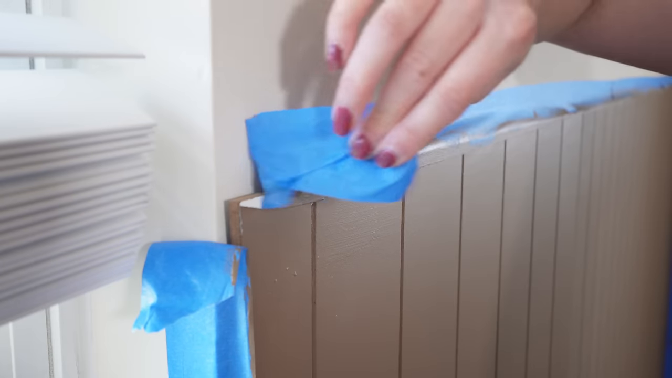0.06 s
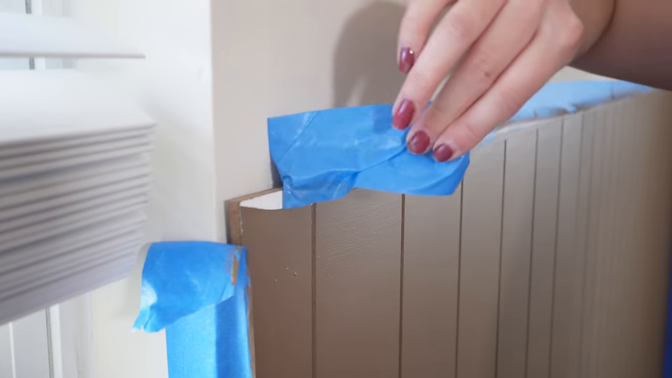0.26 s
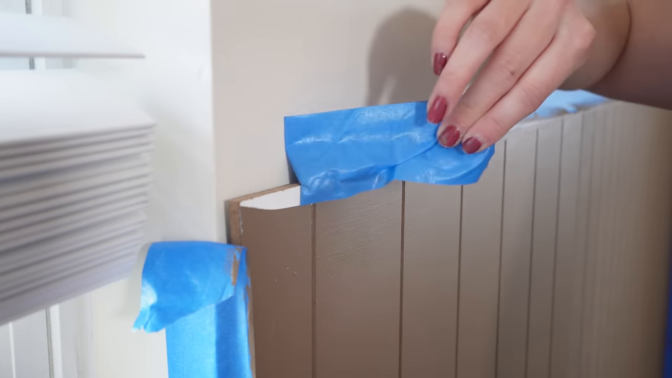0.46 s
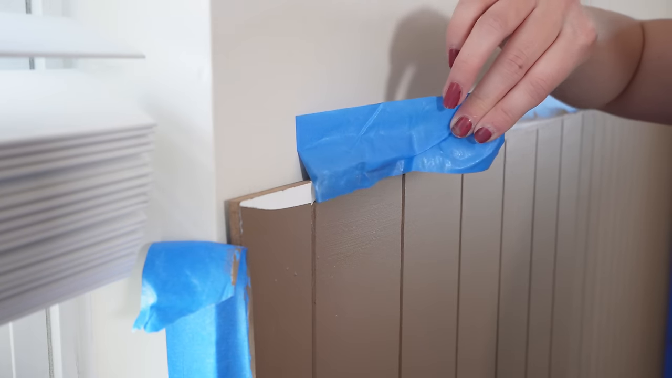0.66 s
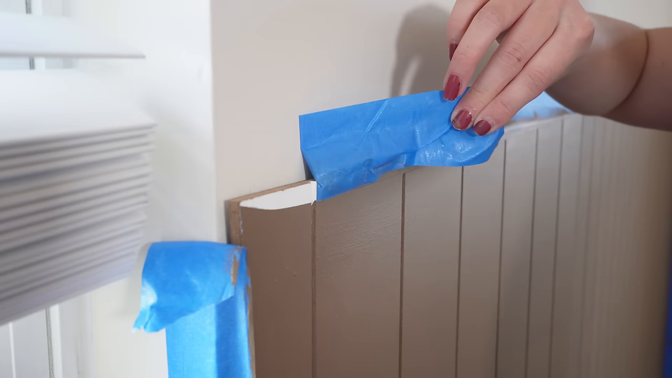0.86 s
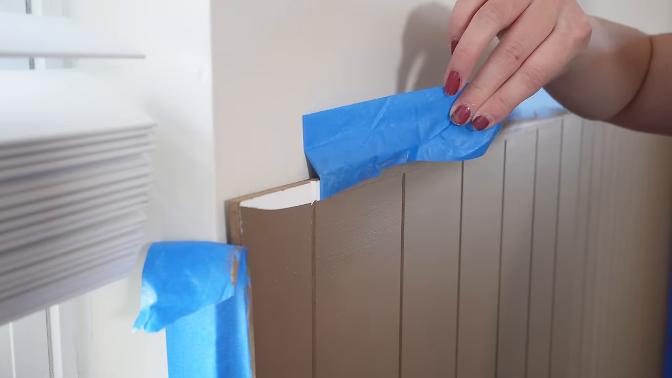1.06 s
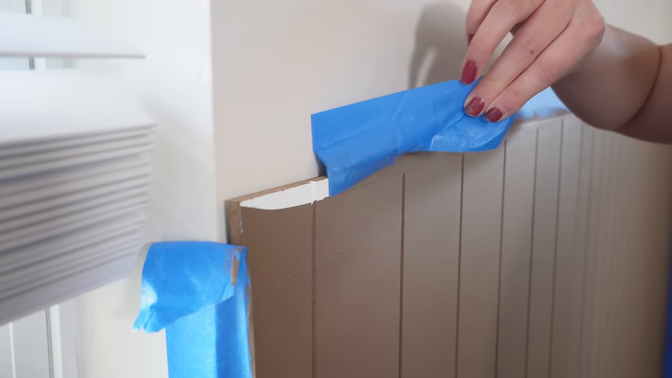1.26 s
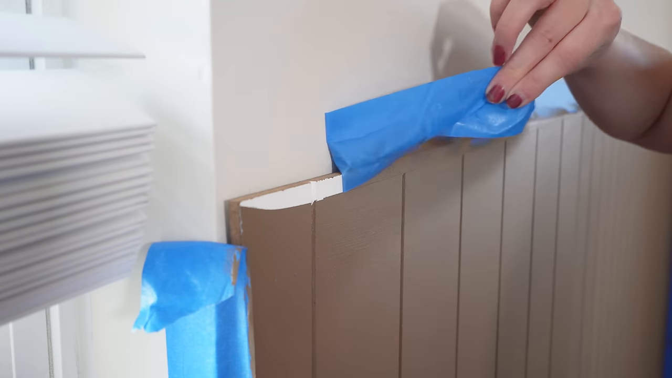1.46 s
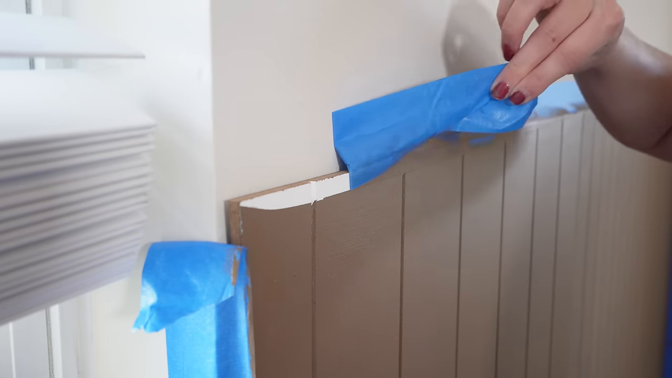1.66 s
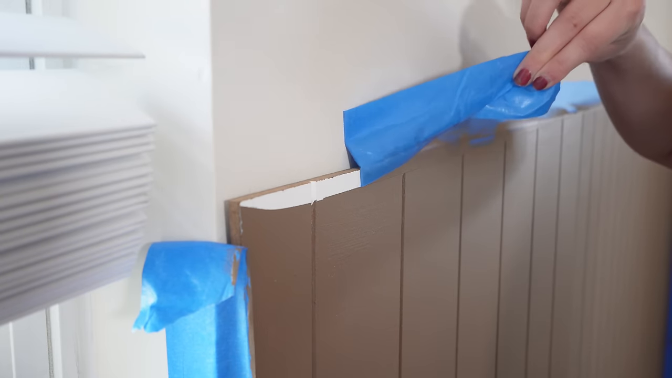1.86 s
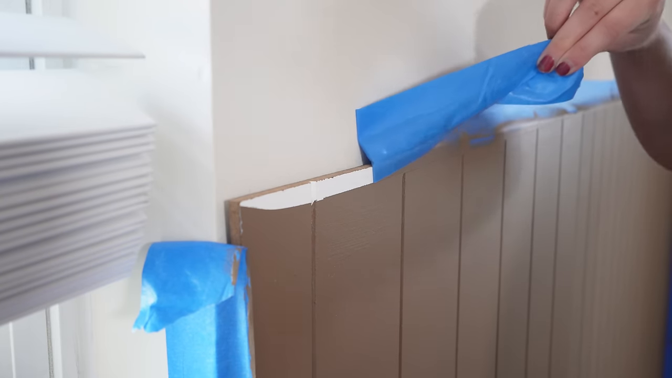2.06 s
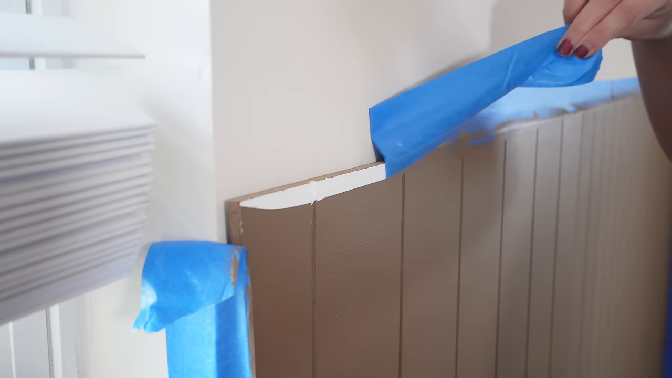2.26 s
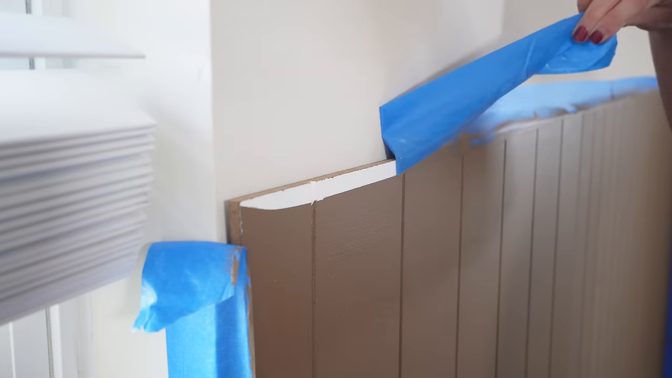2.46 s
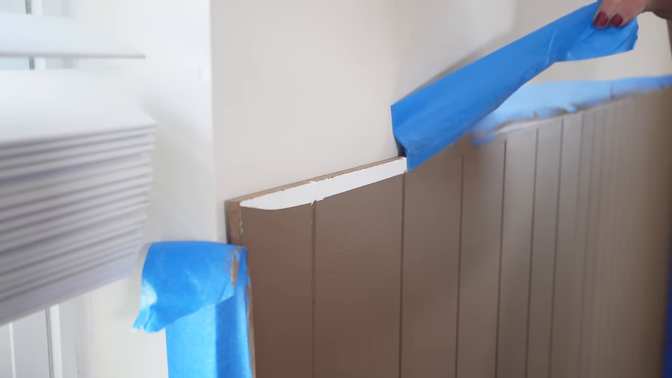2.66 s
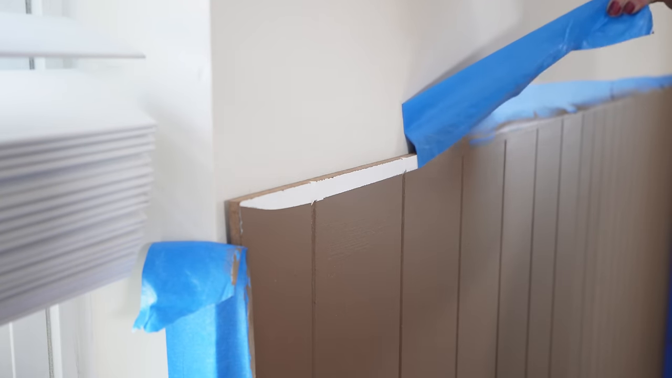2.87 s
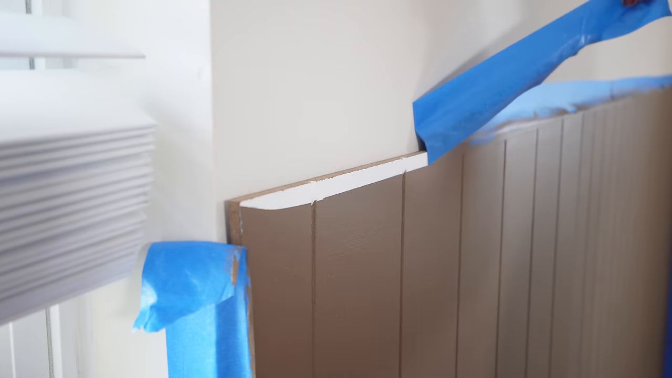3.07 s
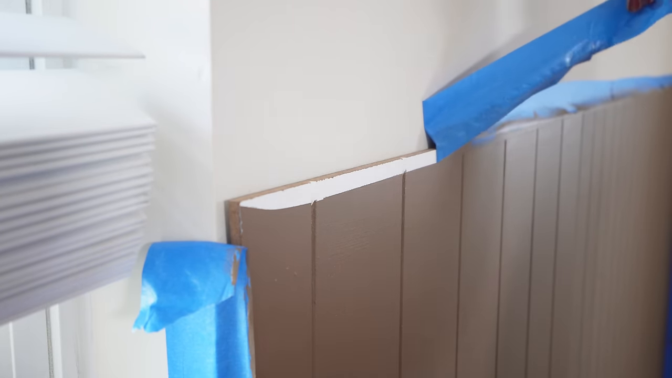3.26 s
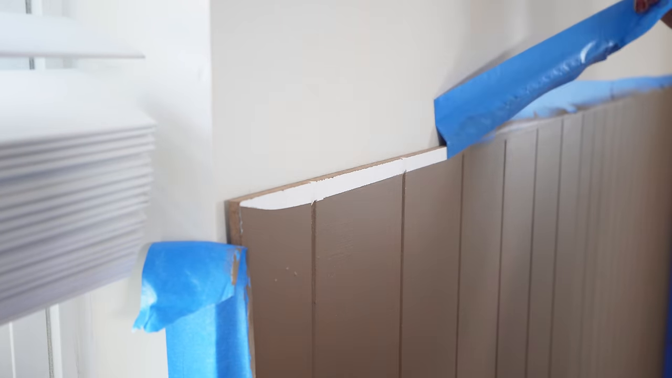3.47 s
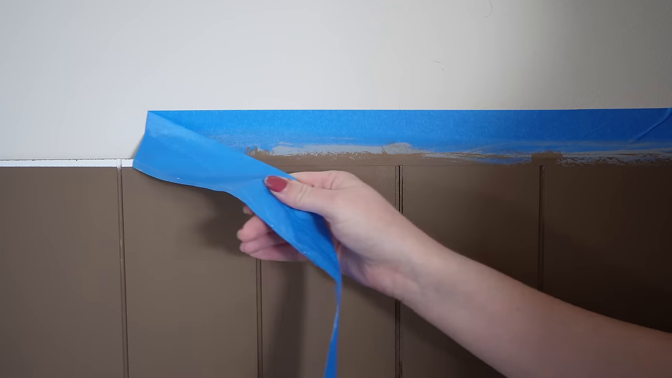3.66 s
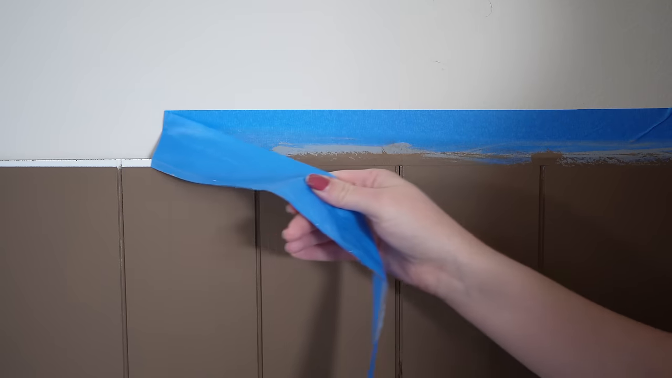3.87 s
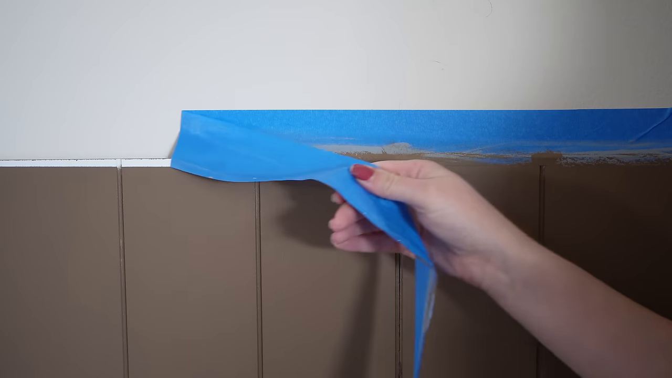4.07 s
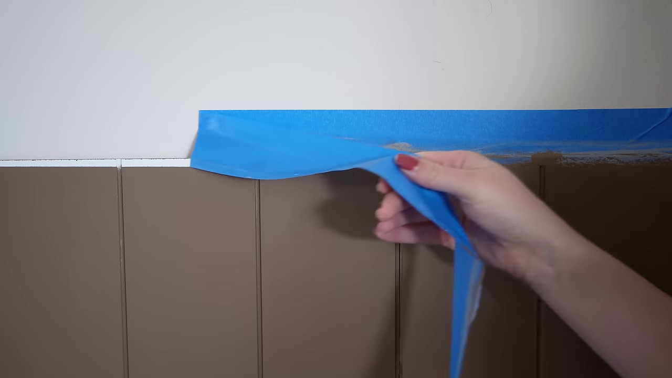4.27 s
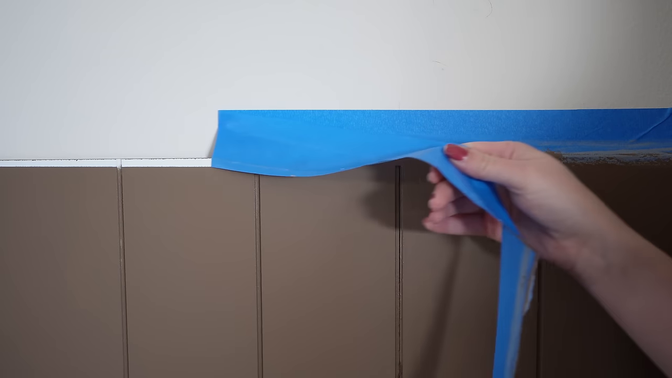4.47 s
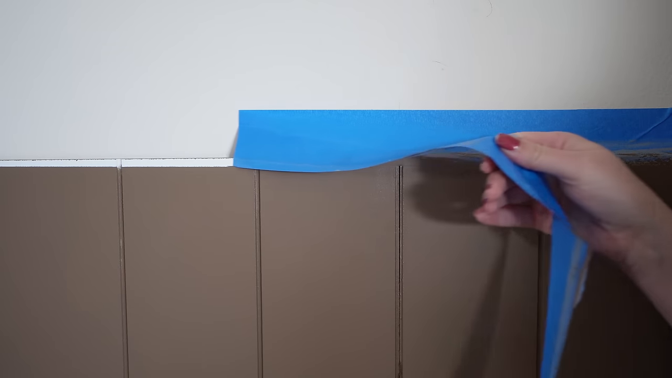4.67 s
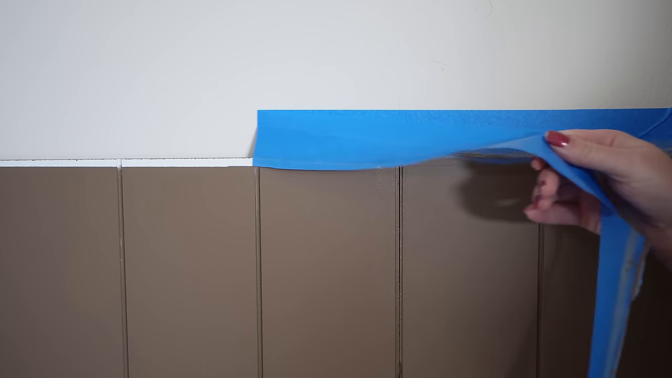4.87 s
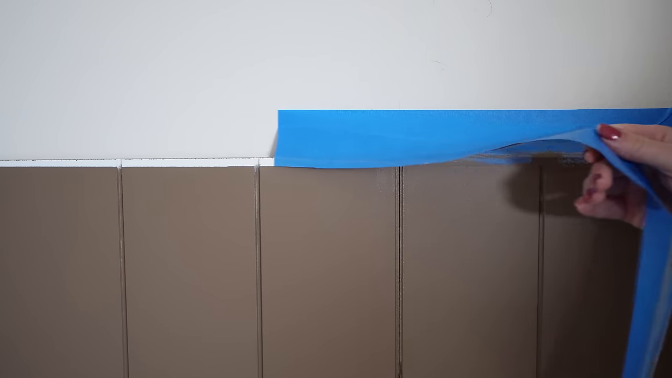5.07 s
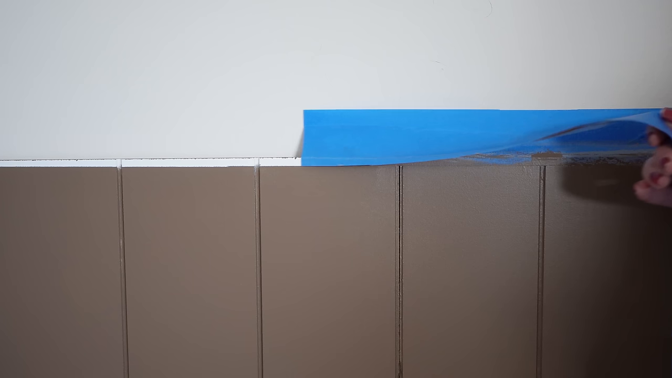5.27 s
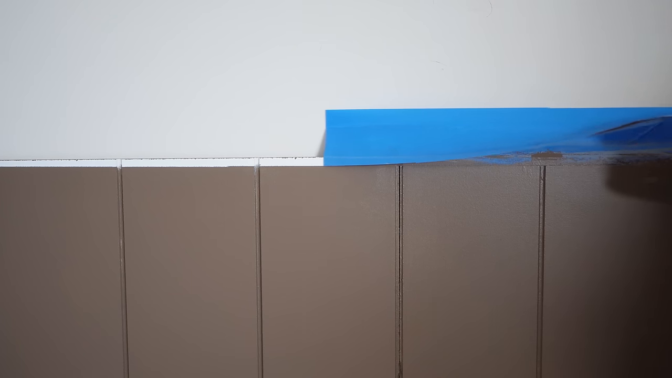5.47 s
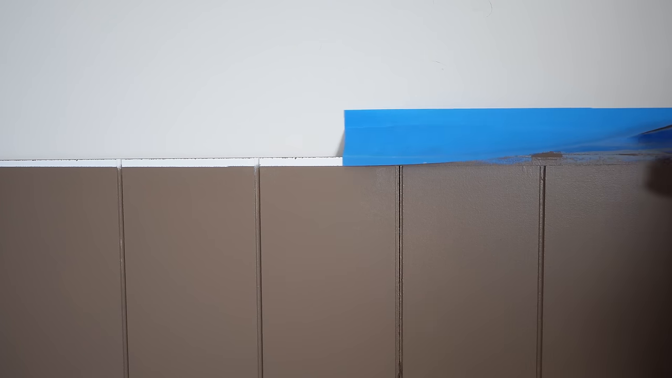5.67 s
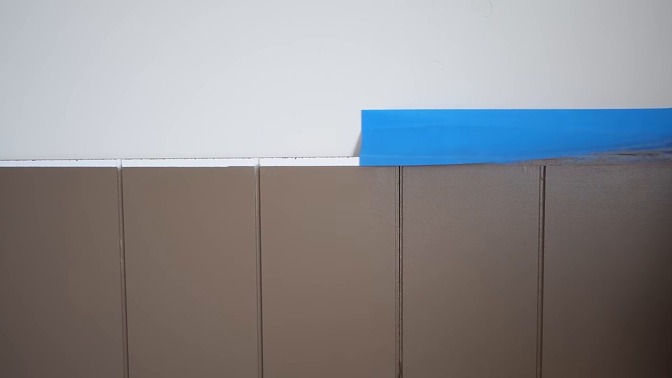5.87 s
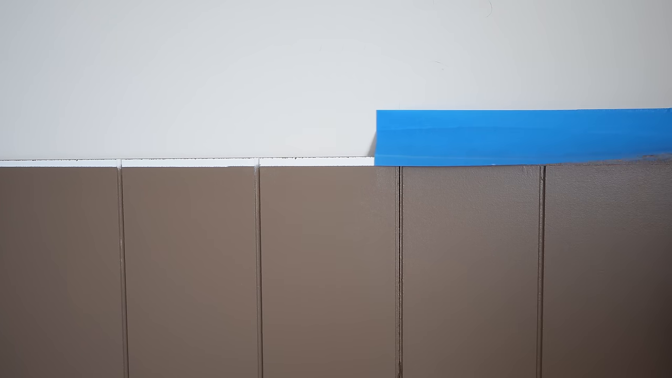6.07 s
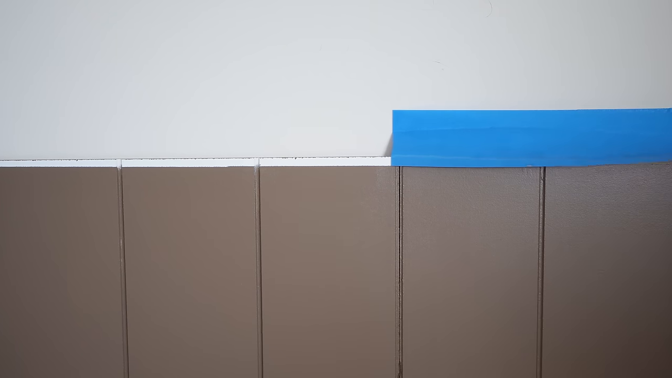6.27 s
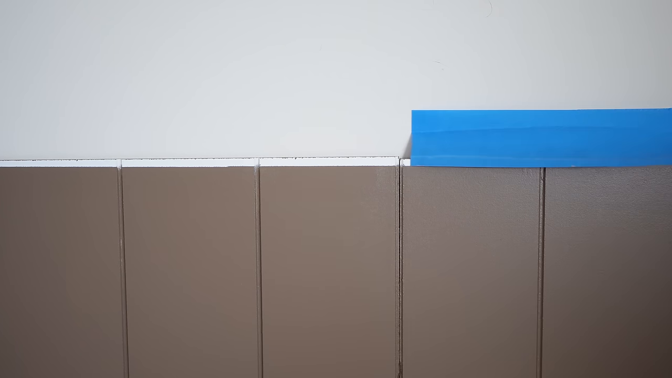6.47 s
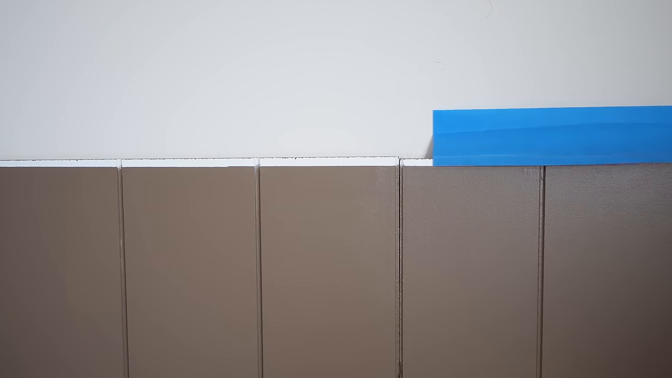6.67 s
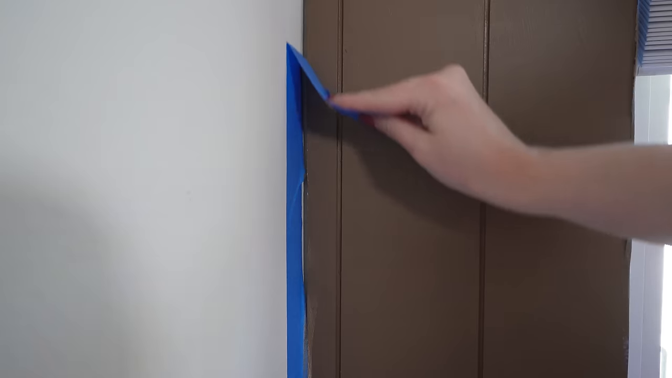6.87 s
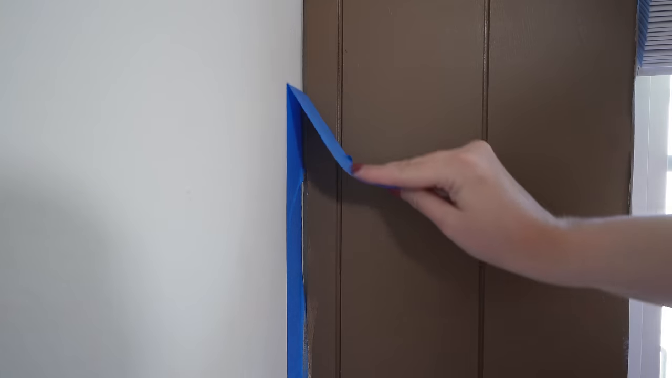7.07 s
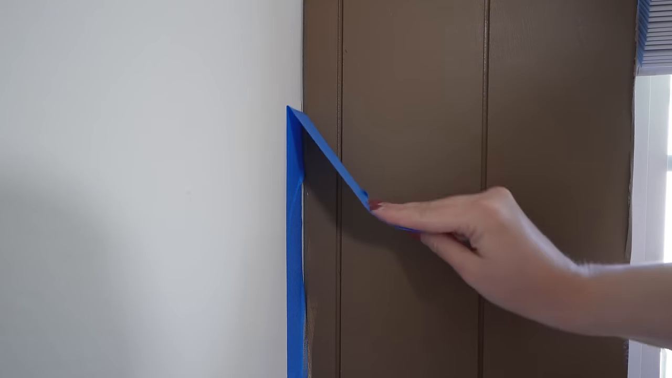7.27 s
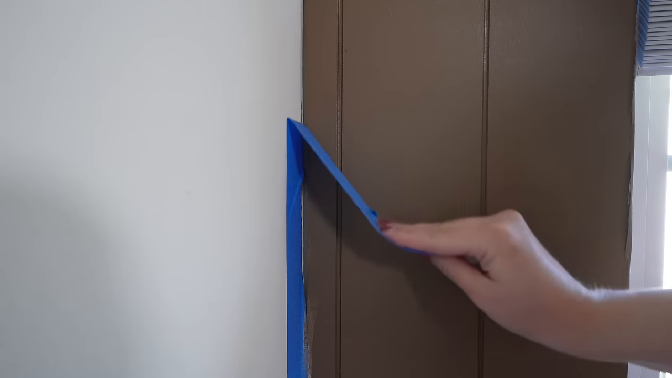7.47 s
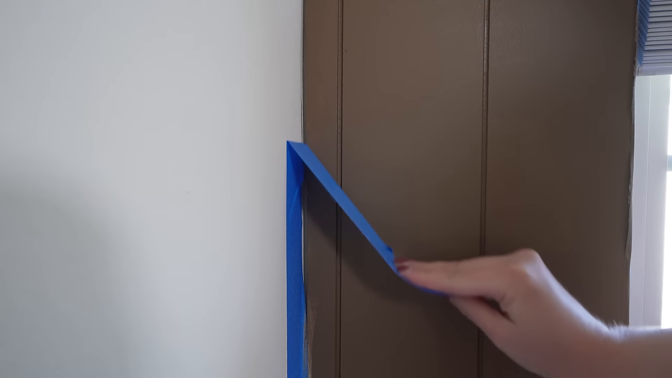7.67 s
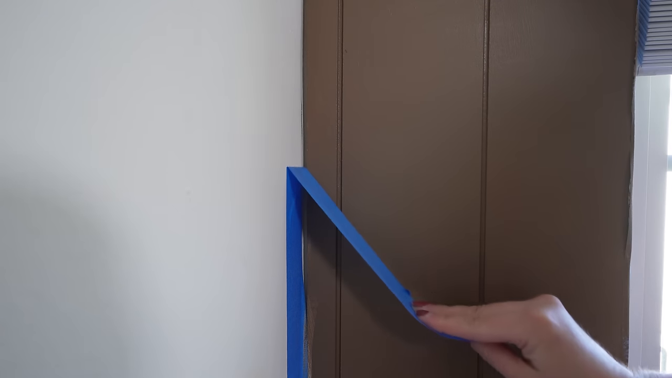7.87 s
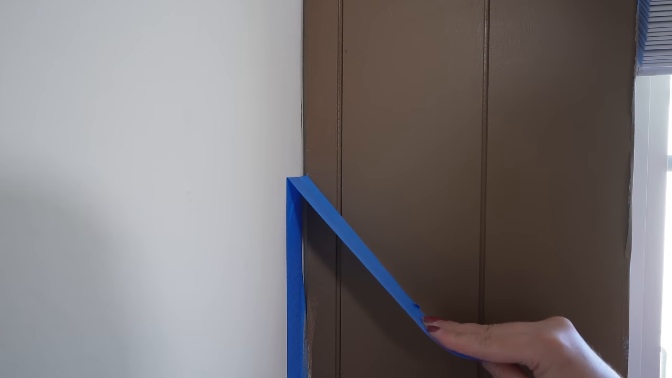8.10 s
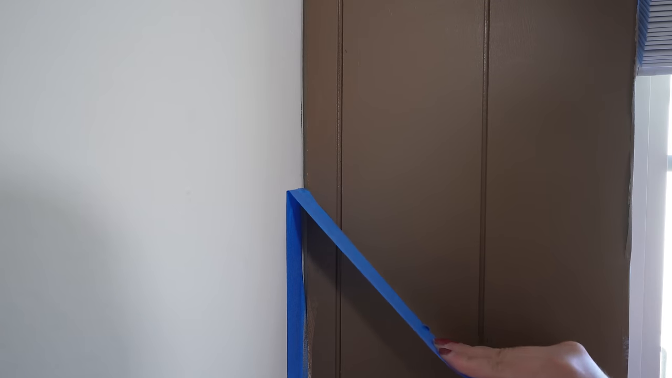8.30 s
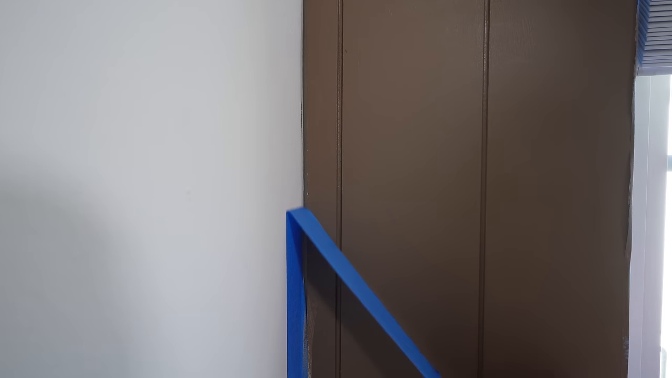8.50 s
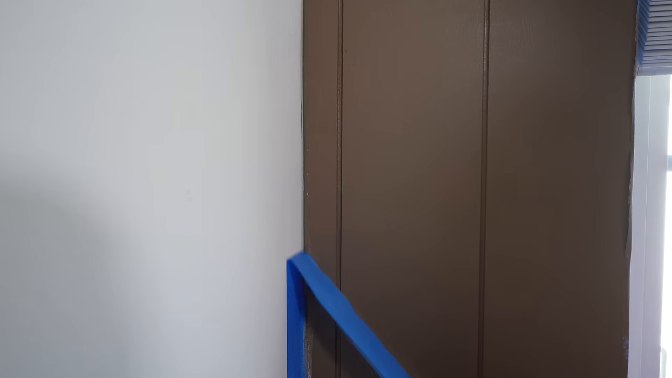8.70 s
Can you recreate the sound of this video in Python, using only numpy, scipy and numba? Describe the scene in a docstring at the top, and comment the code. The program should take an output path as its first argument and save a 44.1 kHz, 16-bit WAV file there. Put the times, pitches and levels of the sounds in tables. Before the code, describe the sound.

Masking tape peels off painted wood panelling up close, first in crackling jerks, then one long fizzing rip, then short downward pulls with sharp snaps.

```python
"""Paper masking tape is peeled off painted wood panelling in a small room, heard from close by.
The first strip lets go in jerks, the second comes off in one long rip, the third in short downward pulls.
Random bursts of glue threads through gliding resonances crackle and fizz, and the panel drums under them.
Paint chips and creases snap as dispersed cracks with a ring and a brief shiver.
Echoes and a short noise tail make the room; filtered noise makes its still air and a faint rumble."""
import sys
import numpy as np
from scipy import signal
from scipy.fft import rfft, irfft
from scipy.io import wavfile
from scipy.ndimage import uniform_filter1d
from numba import njit

SR = 44100
rng = np.random.default_rng(int(sys.argv[2]) if len(sys.argv) > 2 else 0)


def inscribe(sig):
    """Save sig as 16-bit PCM at rate SR to the path in sys.argv[1].

    A 1-D sig is mono; a 2-D sig holds one channel per row.
    Samples are clipped to [-1, 1] before scaling.
    """
    pcm = np.round(np.clip(np.atleast_2d(sig).T, -1, 1) * 32767)
    wavfile.write(sys.argv[1], SR, pcm.astype(np.int16))


N = 385434
TIME = np.arange(N) / SR

# Loudest paint chips and creases snapping. Each row: time in seconds, relative level in dB,
# tilt in dB per octave, ring in Hz, ring height in dB before beaming.
SNAPS = [(0.024, -12.5, -1, 4860, 7.5), (0.0974, -13.5, -3, 2370, 3), (0.1443, -15, -2, 9900, 13),
         (0.1613, -19.5, -4, 1380, 13), (0.2686, -10.5, 0.2, 5060, 8), (0.3609, -0.5, 0.7, 1980, 10.5),
         (0.382, -20, -2.5, 2900, 17), (0.5062, -20, 0.5, 3820, 11), (0.5264, -18.5, 1.5, 3390, 6),
         (0.7289, -9, -0.5, 10100, 5), (1.336, -8, -1, 2430, 4), (1.346, -11, -0.5, 2600, 13),
         (1.475, -17.5, -4, 2240, 16), (1.4823, -4, 1, 2380, 6.5), (1.7774, -14, 0.5, 4570, 12),
         (1.786, 0, 1, 2340, 5), (2.0306, -3.5, 0.1, 1930, 9.5), (2.1817, -10, -0.3, 3710, -5),
         (2.1954, -8, 0, 2200, 10), (2.2267, -16, -2.7, 3240, 5.5), (2.387, -15, -1, 2830, 5),
         (2.3999, -5.5, 0.4, 1890, 4.5), (2.6081, -8, -1.5, 3560, 7), (2.6337, -14, -0.8, 9700, 14),
         (2.6667, -5, -0.2, 1270, 7), (2.713, -14.5, -1.5, 8350, 5), (2.752, -7.5, -1.5, 3070, 3.5),
         (2.9806, -17, -1.5, 1090, 8), (2.989, -7, -2, 2710, 3), (3.015, -11, 2.5, 3770, 6),
         (3.219, -14, -3.5, 3940, 10), (3.2482, -21.5, -6, 1070, 7.5), (3.4047, -6, 1.5, 1510, 0),
         (4.044, -19, 1, 8700, 11), (4.3555, -13.5, 6.5, 10000, -0.5), (4.5356, -12.5, 3, 2570, 12),
         (4.5514, -13.5, 2, 2470, 8.5), (4.591, -14, 2.5, 2450, 8), (4.9688, -8, -3.5, 1550, 10),
         (4.98, -11.5, -1, 9800, 8), (5.7424, -26.5, 4, 10600, 16.5), (5.9607, -12, -0.5, 1290, 7),
         (6.4, -7, -1.5, 3930, 3), (6.4037, -8.5, 6.5, 7100, 9.5), (6.4259, -5, -2, 1310, 20.5),
         (6.434, -7.5, 0.5, 10500, 10), (7.0352, -20, 1, 1620, 22), (7.3482, -24.5, 2.5, 10000, -1),
         (8.3276, -6.5, -0.7, 1780, 8.5), (8.6514, -8, 2, 1640, 7), (8.699, -10.5, -1, 6970, 7.5)]
# Start of each strip in seconds, then the end of the last.
STRIP_STARTS_S = [0, 3.46, 6.83, 9]
# Steady pull on the second strip. Each row: time in seconds, relative crackle level in dB,
# relative fizz level in dB.
RIP = [(3.46, -63.5, -6), (3.75, -62, -4), (3.97, -57, -2), (4.27, -61, 2), (4.42, -57.5, -0.5),
       (4.8, -54.5, 1.5), (5.25, -51.5, -4), (5.85, -55.5, -4), (6.15, -54, -6.5), (6.38, -53, -6.5),
       (6.55, -55.5, -6.5)]


def undb(db):
    """Decibels to gain."""
    return 10 ** (np.asarray(db) / 20)


def unit(x):
    """Scale to rms 1."""
    return x / np.sqrt(np.mean(x ** 2))


def curves(table):
    """Each column of a table, joined by straight lines in time."""
    times_s, *columns = np.transpose(table)
    return [np.interp(TIME, times_s, column) for column in columns]


def convolve(x, response):
    """Sound x through an impulse response."""
    return signal.oaconvolve(x, response)[:len(x)]


def bins(size=2048):
    """Frequencies in Hz at which colours are drawn."""
    return np.maximum(np.arange(size // 2 + 1), 0.5) * SR / size


def colour(points):
    """Gain in dB at each bin, from (Hz, dB) points joined on a log frequency axis."""
    hz, db = np.transpose(points)
    return np.interp(np.log(bins()), np.log(hz), db)


def impulse(db):
    """Minimum-phase response with the given gain, by folding the cepstrum."""
    cepstrum = irfft(np.log(undb(db)))
    half = len(cepstrum) // 2
    cepstrum[1:half] *= 2
    cepstrum[half + 1:] = 0
    return irfft(np.exp(rfft(cepstrum)))


def band(x, hz, kind, order=3):
    """Butterworth filter."""
    return signal.sosfilt(signal.butter(order, hz, kind, fs=SR, output="sos"), x)


def split(x, hz):
    """Steep low and high parts that stay in phase with each other."""
    return [band(band(x, hz, kind, order=4), hz, kind, order=4) for kind in ("lowpass", "highpass")]


def walk(rate_hz):
    """Random levels joined by straight lines, rate_hz of them a second."""
    return np.interp(TIME * rate_hz, np.arange(N // 20), rng.standard_normal(N // 20))


def steady(x, seconds=0.39):
    """Even out slow swells, leaving rms 1 and the quick grain."""
    power = uniform_filter1d(x ** 2, int(seconds * SR))
    return x / np.sqrt(power + 1e-6 * np.mean(x ** 2))


@njit
def resonance(x, centre_hz, width_hz):
    """State-variable band-pass with a moving centre, gain 1 at the peak."""
    y, band_state, low_state = np.empty(len(x)), 0., 0.
    for i in range(len(x)):
        g, damping = np.tan(np.pi * centre_hz[i] / SR), width_hz / centre_hz[i]
        v = (band_state + g * (x[i] - low_state)) / (1 + g * (g + damping))
        band_state = 2 * v - band_state
        low_state += 2 * g * v
        y[i] = damping * v
    return y


def by_strip(values):
    """Each strip's value while that strip is being peeled."""
    spans = zip(values, STRIP_STARTS_S, STRIP_STARTS_S[1:])
    return sum(value * ((TIME >= start) & (TIME < end)) for value, start, end in spans)


def air():
    """Still air of the room: faint steady coloured noise."""
    # Each row: frequency in Hz, relative level in dB.
    air_colour = [(20, -0.5), (45, -13), (200, -5.5), (400, -15.5), (1300, -22.5), (9000, -23),
                  (16000, -43.5)]
    return undb(-77) * unit(convolve(rng.standard_normal(N), impulse(colour(air_colour))))


def rumble():
    """Very faint low-passed noise, opposite in the two ears."""
    return undb(-89) * unit(band(rng.standard_normal(N), 60, "lowpass", order=1))


def walls(tail_db=-12, t60_s=0.33, treble_t60_s=0.49, treble_db=-4):
    """Room response from one spot: distinct echoes and a short tail whose treble decays more slowly."""
    # Nearby walls. Each row: nominal delay in seconds, gain in dB.
    echoes = [(.0068, -19), (0.015, -20.5), (0.0157, -20), (0.027, -33)]
    t = TIME[:SR * 2 // 3]
    noise = rng.standard_normal(len(t))
    tail = band(noise, 6000, "lowpass") * undb(-60 * t / t60_s)
    tail += band(noise, 6500, "highpass") * undb(treble_db - 60 * t / treble_t60_s)
    tail *= 1 - np.exp(-t / 0.0021)
    response = undb(tail_db) * tail / np.linalg.norm(tail)
    for (delay_s, db), shift in zip(echoes, rng.standard_normal(len(echoes))):
        response[int(delay_s * (1 + 0.03 * shift) * SR)] += undb(db)
    return response


def room(x, count=8):
    """As the peel line travels, the room's answer glides from one spot's to the next."""
    spot = np.linspace(0, count - 1, N)
    out = 0
    for k in range(count):
        share = np.sqrt(np.maximum(1 - abs(spot - k), 0))
        out = out + convolve(x * share, walls())
    return out


def bend(x, lag_s=0.000221):
    """Bending waves run slower the lower they are: lag_s is their travel time at 3 kHz."""
    phase = 4 * np.pi * lag_s * np.sqrt(bins() * 3000)
    return irfft(rfft(x) * np.exp(-1j * phase))


def chips(pull_db, count=70, jerky_db=33, long_db=31, downward_db=30, scatter_db=-0.5,
          low_hz=1100, high_hz=10000, ring_db=9):
    """Small flakes of paint snap at random, louder the harder the pull; rows as in SNAPS."""
    level_db = pull_db + by_strip([jerky_db, long_db, downward_db])
    rows = []
    for when, size, tilt, pitch in rng.random((count, 4)):
        db = level_db[int(when * N)] + scatter_db * (2 * size - 1)
        ring_hz = low_hz * (high_hz / low_hz) ** pitch
        rows.append((when * N / SR, db, 2 * (2 * tilt - 1), ring_hz, ring_db))
    return rows


def snaps(rows, focus, level_db=-1, shiver_db=-4, shiver_t60_s=0.0084, shiver_hz=4500, ring_octaves=0.38):
    """Each snap is a sharp crack with its own ring, then the taut tape shivers for a few milliseconds.
    The ring is beamed: focus is 1 in one direction, and lower for the sound sent all around."""
    # Colour shared by all snaps. Each row: frequency in Hz, relative level in dB.
    snap_colour = [(40, -37), (120, -25.5), (250, -10.5), (550, -6), (1500, -11.5), (2500, -4.5),
                   (4500, -4.5), (6500, -4.5), (9500, -10.5), (14000, -17.5)]
    hz = bins()
    octaves = np.log2(np.maximum(hz, 300) / 3000)
    out = np.zeros(N + SR)
    t = TIME[:SR // 80]
    envelope = undb(-60 * t / shiver_t60_s) * (1 - np.exp(-t / 0.0014))
    noises = rng.standard_normal((len(rows), len(t)))
    for (start_s, db, tilt_db, ring_hz, ring_db), noise in zip(rows, noises):
        peak = np.exp(-(np.log2(hz / ring_hz) / ring_octaves) ** 2)
        # what is not beamed spreads over all frequencies
        peak_db = ring_db * (focus * peak + (1 - focus) * 0.053)
        crack = bend(impulse(db + level_db + colour(snap_colour) + tilt_db * octaves + peak_db))
        shiver = band(noise, shiver_hz, "lowpass", order=1) * envelope
        shiver *= undb(shiver_db) / np.linalg.norm(shiver)
        start = int(start_s * SR)
        out[start:start + len(crack)] += crack + convolve(crack, shiver)
    return out[:N]


def tugs(table, attack_s, release_s):
    """Power that tugs put into tape and board: each builds up, holds for its length and dies away."""
    power = np.zeros((2, N))
    for start_s, length_s, db, thump_db in table:
        before = np.maximum((start_s - TIME) / attack_s, 0)
        after = np.maximum((TIME - start_s - length_s) / release_s, 0)
        power += np.outer(undb([db, db + thump_db]), np.exp(-before - after)) ** 2
    return power


def pull():
    """Pull on tape and board in dB: steady travel of the peel line, plus jerks and strokes."""
    # Slow creep of the first strip between jerks. Each row: time in seconds, relative crackle level in dB.
    creep = [(0, -57.5), (.4, -62.5), (.7, -63.5), (.8, -78), (.97, -85), (1.13, -68), (1.4, -61),
             (1.7, -70), (2.2, -61), (3.46, -63.5)]
    # The tape gives way all at once, runs on briefly and slows. Each row: start in seconds,
    # length in seconds, relative crackle level in dB, extra thump on the board in dB.
    jerks = [(.125, 0.075, -53, 4), (.43, 0.026, -55.5, 2), (1.35, .005, -56.5, -3), (1.42, 0.14, -61, 2.5),
             (1.79, 0.017, -55, 3), (2.025, .02, -51, 1.5), (2.18, 0.087, -60, 5.5),
             (2.41, 0.013, -54.5, 2), (2.625, 0.012, -51, 1.5), (2.82, 0.042, -54, 2),
             (2.99, 0.017, -61, 6), (3.225, .025, -57, 0), (3.405, 0.03, -51.5, 1), (4.54, 0.021, -50, -15),
             (4.94, 0.042, -53, -1), (6.44, 0.018, -49, 4), (6.64, 0.15, -49.5, -0.5)]
    # Pulls of the hand that draw the third strip down; columns as in jerks.
    strokes = [(6.89, 0.21, -49.5, -0.5), (7.27, 0.045, -56.5, 2), (7.58, 0.05, -61, 2),
               (7.81, 0.058, -53, 4.5), (8.06, 0.023, -65.5, 0.5), (8.31, .01, -54, -2.5),
               (8.58, .09, -48.5, 1), (8.73, .01, -48, 5)]
    rest_db = -74  # third strip, between strokes
    travel_db = by_strip([curves(creep)[0], curves(RIP)[0], rest_db])
    power = undb(travel_db) ** 2
    power = power + tugs(jerks, attack_s=0.025, release_s=0.051)
    power += tugs(strokes, attack_s=0.065, release_s=0.035)
    return 10 * np.log10(power)


def glue(rate_hz, scatter_db, slip_hz, slip_db, sharpness=1.29, own_db=2):
    """Glue threads burst at random in eight wandering pitch bands, swelling as the peel line sticks and slips."""
    threads = 0
    count = int(rate_hz * N / SR)  # bursts in each band
    for hz in np.geomspace(130, 11000, 8):
        size_db = scatter_db * np.minimum(rng.exponential(size=N // 20), 5)
        size = undb(size_db) * rng.choice([-1, 1], N // 20)
        places = rng.integers(0, N, N // 20)
        bursts = unit(np.bincount(places[:count], size[:count], N))
        pitch_hz = hz * 2 ** (0.3 * np.clip(walk(150), -2, 2))
        threads = threads + resonance(bursts, pitch_hz, hz / sharpness) * undb(own_db * walk(slip_hz))
    return threads * undb(slip_db * walk(slip_hz))


def ring(x, modes):
    """Board and loose flap lend their resonances (Hz, width Hz, dB) to the bursts."""
    return x + sum(undb(db) * resonance(x, hz * np.ones(N), float(width_hz)) for hz, width_hz, db in modes)


def lengthen(modes, peeled_s, short_s):
    """A short, taut flap rings at first; after short_s of peeling the long flap's mode levels take over."""
    short = 1 / (1 + (peeled_s / short_s) ** 4)
    return [(hz, width_hz, long_db + (short_db - long_db) * short) for hz, width_hz, short_db, long_db in modes]


def peel(bursts, spectrum, tape_db, board_db, panel_db, fizz_db, panel_growth, fizz_growth):
    """The tape crackles with each burst, the sharpest edges fizz, and the board behind it drums.
    Drumming and fizz are set for a middling pull; their growth is in dB for each dB of pull."""
    harder_db = tape_db + 60  # above a middling pull
    sound = convolve(bursts, impulse(colour(spectrum)))
    rest, fizz = split(sound, 7000)
    panel, crackle = split(rest, 1000)
    panel_level_db = board_db + panel_db + (panel_growth - 1) * harder_db
    fizz_level_db = tape_db + fizz_db + (fizz_growth - 1) * harder_db
    parts = ((crackle, tape_db), (panel, panel_level_db), (fizz, fizz_level_db))
    return sum(undb(db) * steady(part) for part, db in parts)


def jerky_strip(tape_db, board_db, crackle_db=-2.0):
    """Sparse bursts of uneven size, through resonances that change level as the flap grows."""
    # Each row: frequency in Hz, relative level in dB.
    jerky_colour = [(40, -34), (70, -8.5), (130, -5.5), (250, -1.5), (650, -3.5), (1300, -1.5), (2600, -1),
                    (7500, -2.5), (11000, -9), (16000, -15)]
    # Each row: resonance in Hz, width in Hz, level in dB with a short flap, level in dB with a long one.
    jerky_modes = [(122, 42, -9, 3), (650, 82, 0.5, -14), (2640, 460, 0.5, -15), (4250, 1400, 4, -13)]
    threads = glue(rate_hz=900, scatter_db=3.5, slip_hz=110.4, slip_db=3.5)
    bursts = ring(threads, lengthen(jerky_modes, TIME, short_s=1.3))
    return peel(bursts, jerky_colour, tape_db + crackle_db, board_db,
                panel_db=-8, fizz_db=-4.0, panel_growth=0.83, fizz_growth=1.15)


def long_strip(tape_db, board_db, crackle_db=-1.0, fizz_db=-0.5, board_ring_db=0,
               board_width_hz=61, first_width_hz=850, second_width_hz=1200):
    """Dense, steadier bursts through gliding resonances: boards are crossed and the flap lengthens."""
    # Each row: frequency in Hz, relative level in dB.
    long_colour = [(40, 0), (70, -1), (125, 1), (200, 0.5), (420, 0), (880, -4.5), (1250, -5),
                   (1700, -10.5), (2900, -6.5), (9300, -6.5), (11000, -9), (16000, -15)]
    # Each row: time in seconds, board resonance in Hz, first flap resonance in Hz,
    # second flap resonance in Hz, flap ringing in dB.
    rip_rings = [(3.6, 131, 6000, 7500, -9), (4.4, 129, 6000, 7700, 3.5), (4.65, 434, 5900, 8800, -1),
                 (5.1, 378, 5570, 9100, -3), (5.3, 353, 3770, 5100, -13), (5.8, 208, 3600, 6000, -1),
                 (6.3, 202, 3230, 5800, 7.5), (6.78, 244, 3440, 6100, 9)]
    board_hz, first_hz, second_hz, flap_db = curves(rip_rings)
    modes = ((board_hz, board_width_hz, board_ring_db),
             (first_hz, first_width_hz, flap_db), (second_hz, second_width_hz, flap_db))
    bursts = ring(glue(rate_hz=1800, scatter_db=3, slip_hz=216.0, slip_db=1.5), modes)
    return peel(bursts, long_colour, tape_db + crackle_db, board_db,
                panel_db=-7.0, fizz_db=fizz_db + curves(RIP)[1], panel_growth=1.0, fizz_growth=0.91)


def downward_strip(tape_db, board_db, crackle_db=0.0):
    """Dense bursts of equal size, with a low board resonance beneath those of the flap."""
    # Each row: frequency in Hz, relative level in dB.
    downward_colour = [(40, -22), (70, -2.5), (150, -2.5), (600, -2), (1000, -6), (3000, -4), (8500, -4),
                       (10500, -12), (16000, -13.5)]
    # Each row: resonance in Hz, width in Hz, level in dB with a short flap, level in dB with a long one.
    downward_modes = [(181, 63, -2, -2), (370, 73, -16, -10), (1280, 740, 5, -12.5), (3540, 1500, -4, -23)]
    modes = lengthen(downward_modes, TIME - STRIP_STARTS_S[2], short_s=0.19)
    bursts = ring(glue(rate_hz=1800, scatter_db=0.0, slip_hz=108.7, slip_db=3.0), modes)
    return peel(bursts, downward_colour, tape_db + crackle_db, board_db,
                panel_db=-4, fizz_db=-6, panel_growth=0.61, fizz_growth=0.67)


def strips(tape_db, board_db):
    """Three strips in turn: jerky, long and steady, then pulled in short strokes."""
    return by_strip([strip(tape_db, board_db) for strip in (jerky_strip, long_strip, downward_strip)])


def stick(x, hold_db=-5, hold_s=0.0038):
    """Just before a big snap the tape holds fast and the crackle dips; it lets go with the snap."""
    big_s = [start_s for start_s, db, *_ in SNAPS if db > -11]
    wait_s = np.append(big_s, np.inf)[np.searchsorted(big_s, TIME)] - TIME
    return x * undb(hold_db * np.exp(-wait_s / hold_s))


def scene():
    """Everything sits in the centre; only a faint low rumble differs between the ears."""
    tape_db, board_db = pull()
    tape = stick(strips(tape_db, board_db))
    cracks = list(SNAPS) + chips(tape_db)
    direct = tape + snaps(cracks, focus=1)
    reflected = room(snaps(cracks, focus=0.84) + undb(-4.5) * tape)
    mid = direct + reflected + air()
    side = rumble()
    return np.array([mid + side, mid - side])


def record(dry):
    """Steep elliptic low-pass at 16 kHz."""
    return signal.sosfilt(signal.ellip(8, 0.2, 70, 16000, fs=SR, output="sos"), dry)


dry = scene()
out = record(dry)
inscribe(out)
```